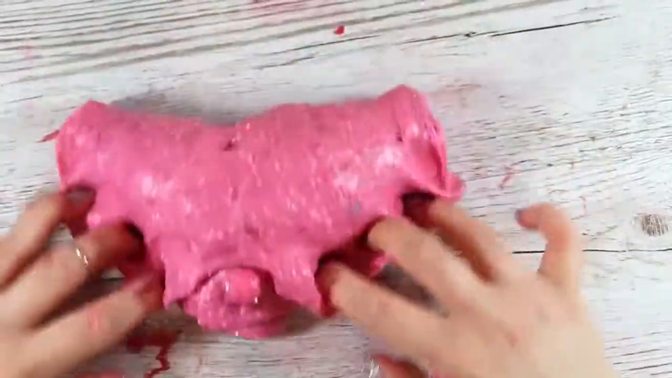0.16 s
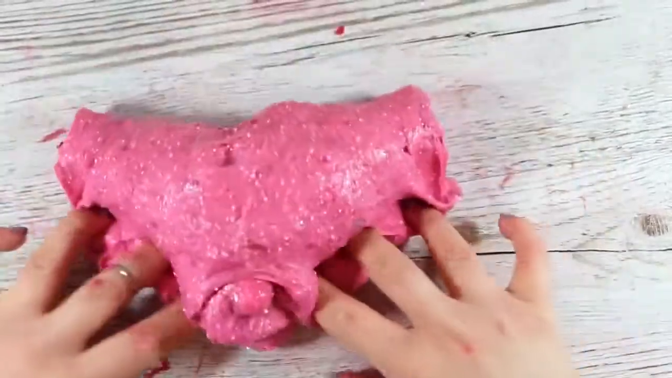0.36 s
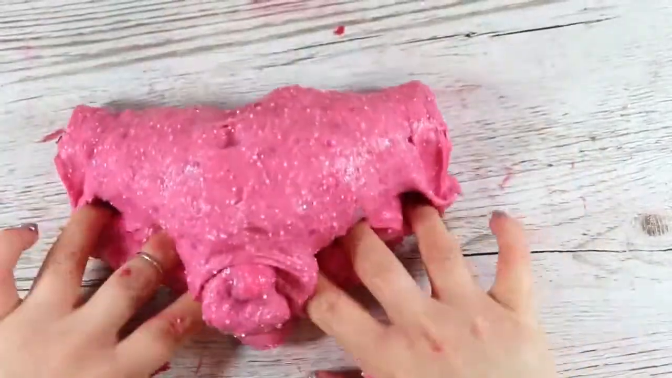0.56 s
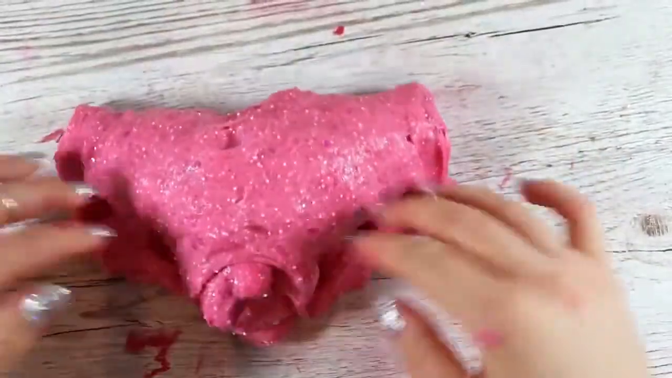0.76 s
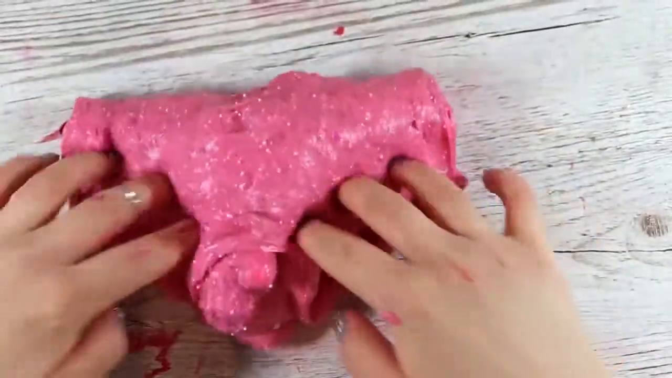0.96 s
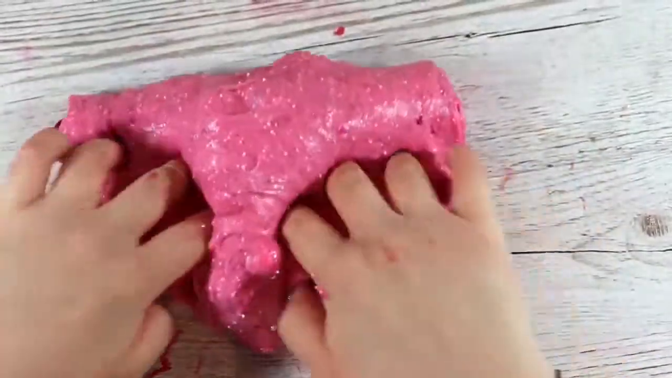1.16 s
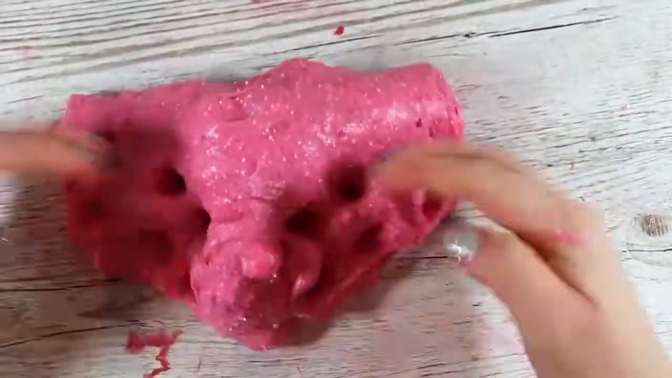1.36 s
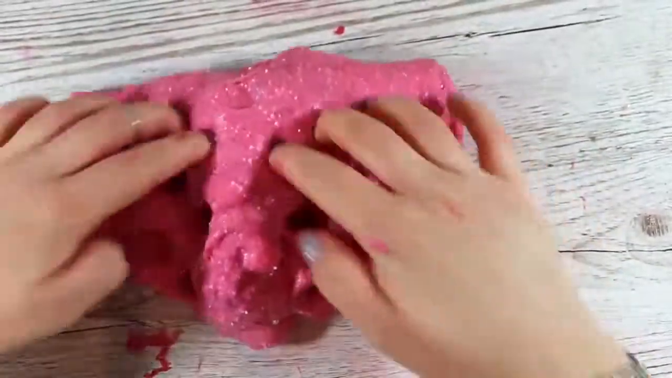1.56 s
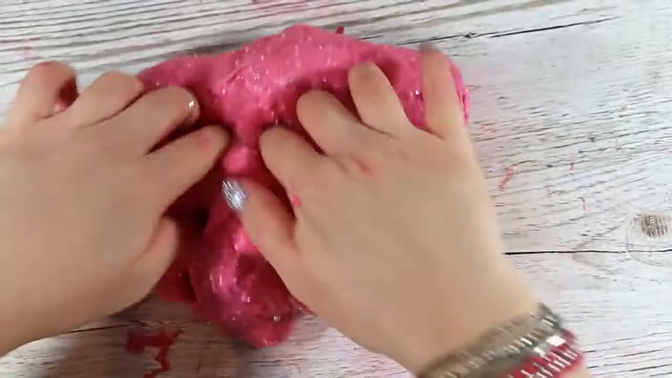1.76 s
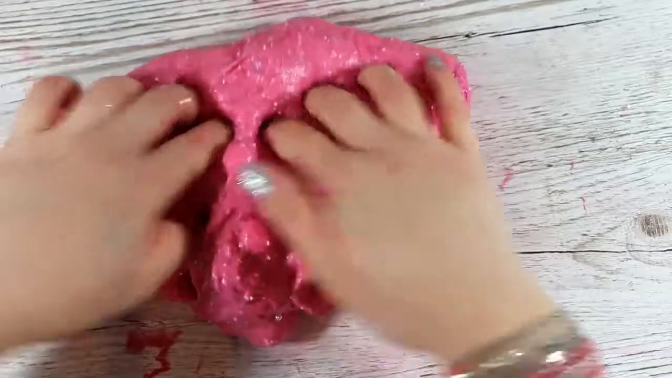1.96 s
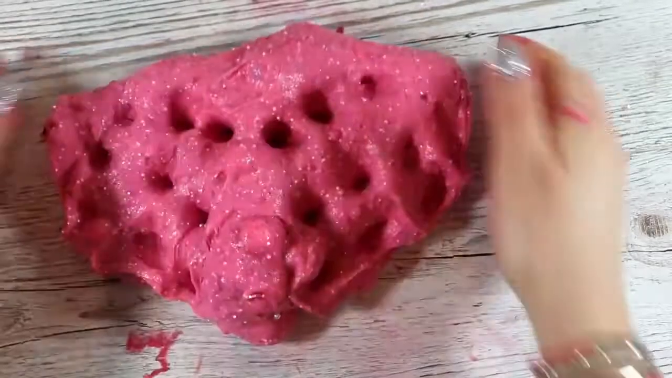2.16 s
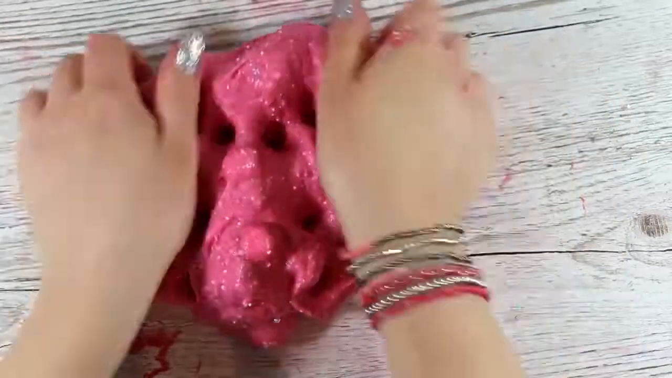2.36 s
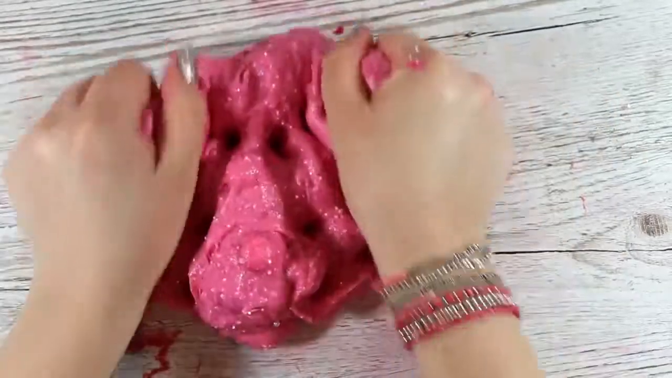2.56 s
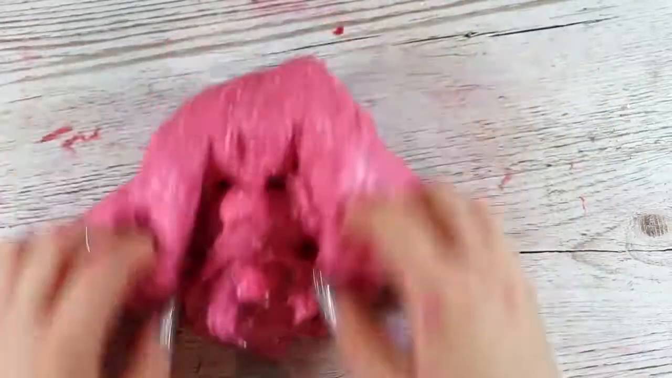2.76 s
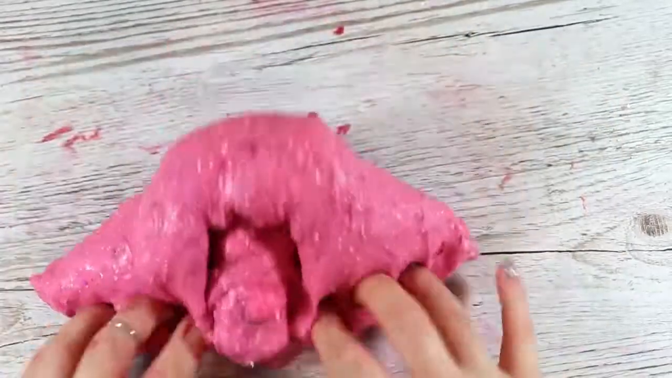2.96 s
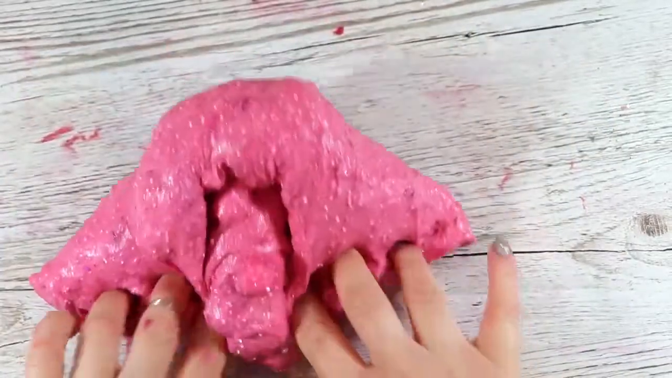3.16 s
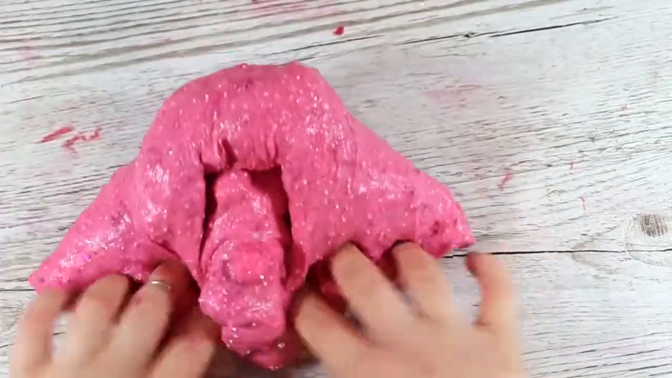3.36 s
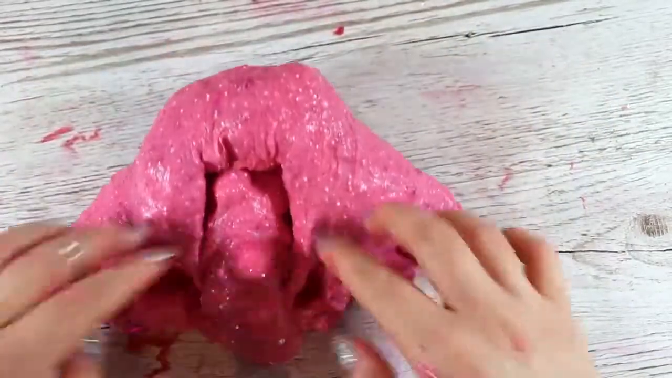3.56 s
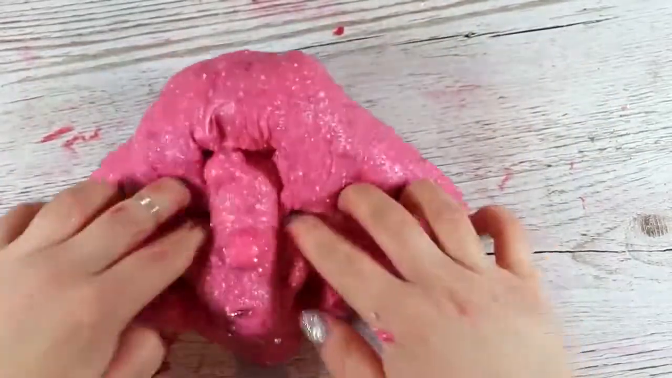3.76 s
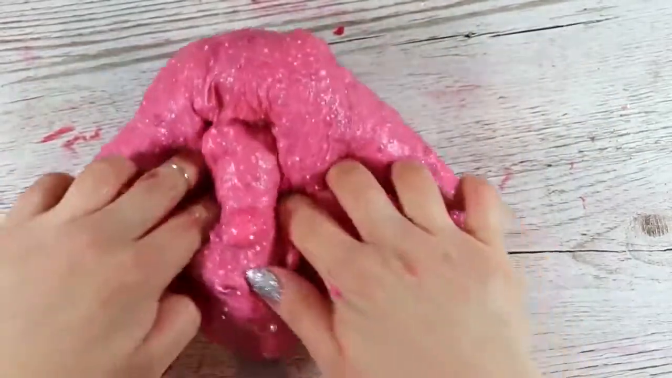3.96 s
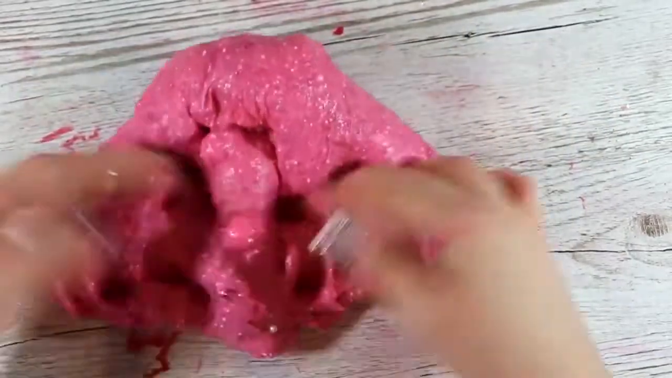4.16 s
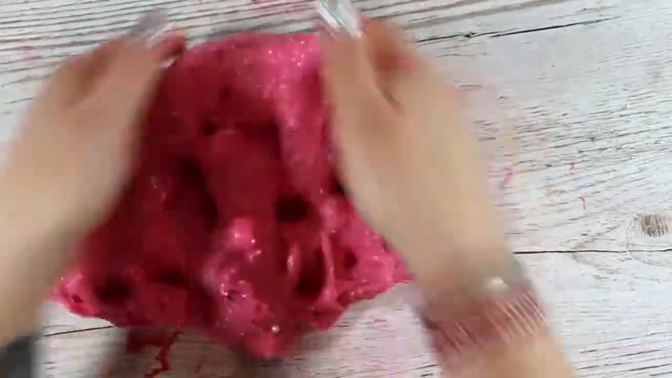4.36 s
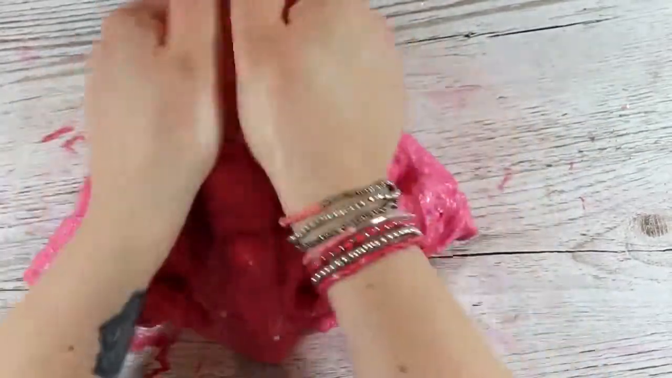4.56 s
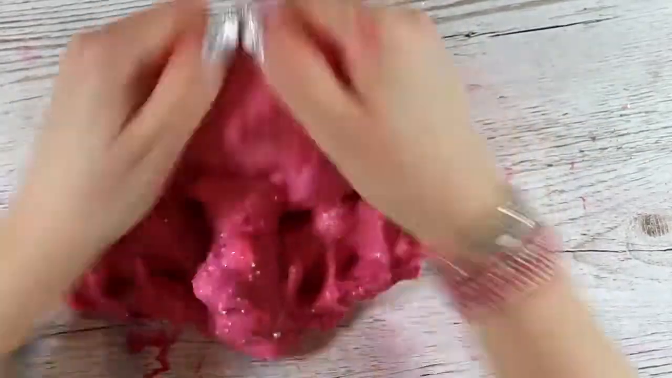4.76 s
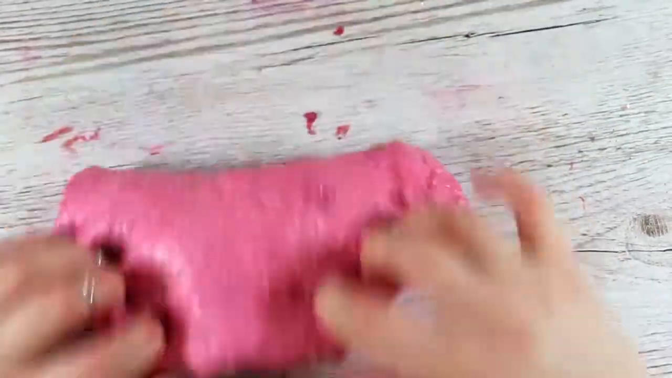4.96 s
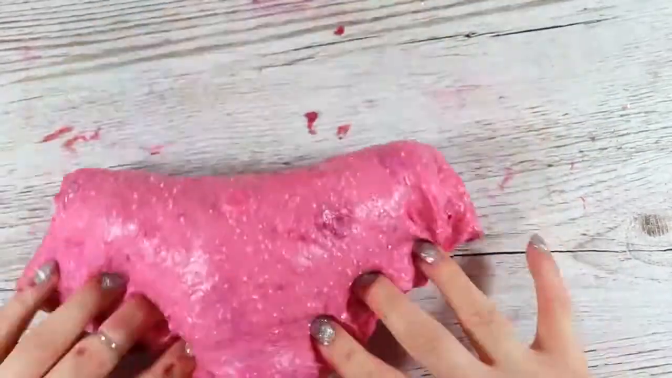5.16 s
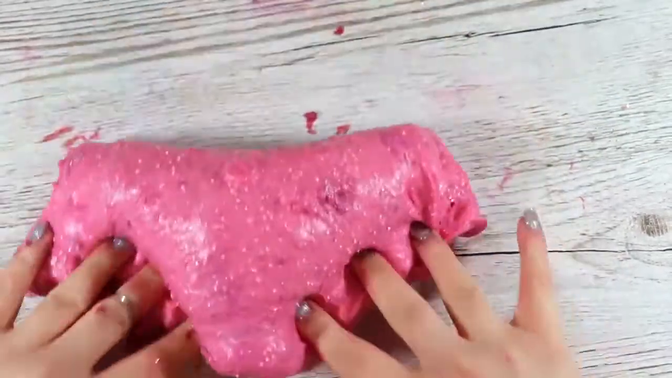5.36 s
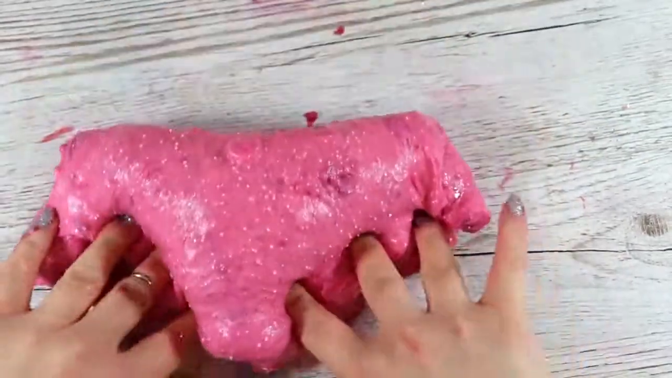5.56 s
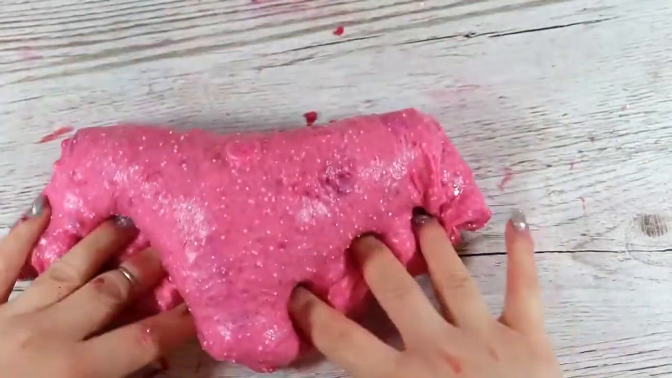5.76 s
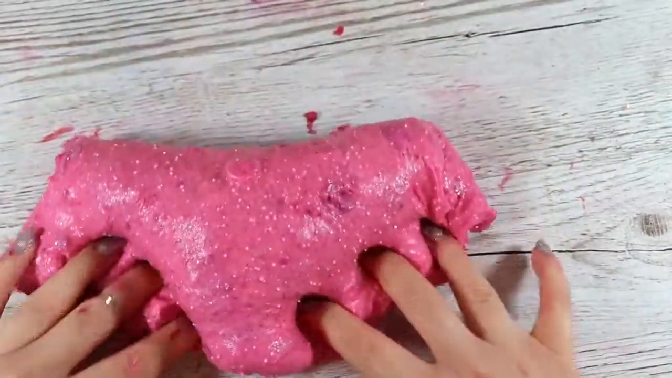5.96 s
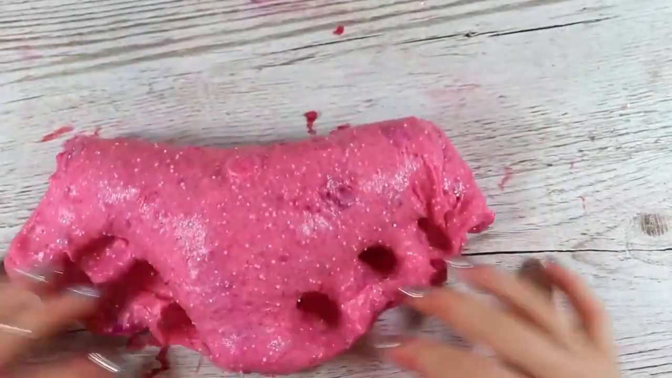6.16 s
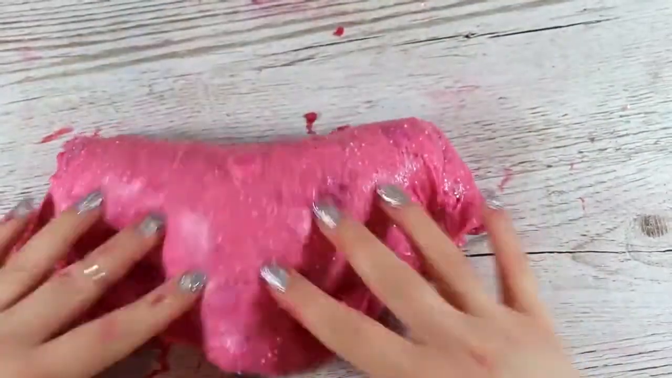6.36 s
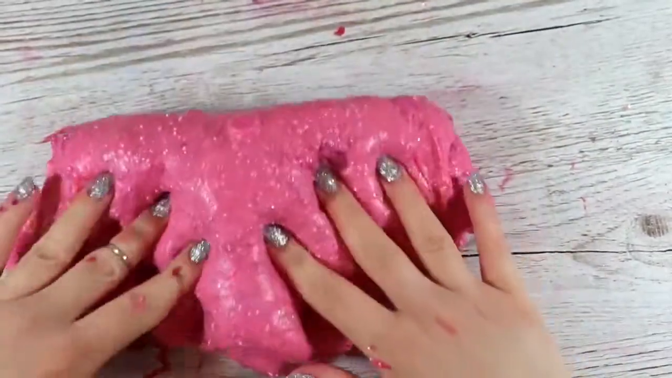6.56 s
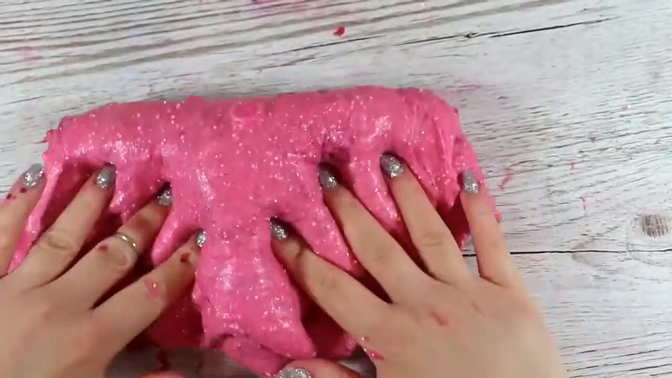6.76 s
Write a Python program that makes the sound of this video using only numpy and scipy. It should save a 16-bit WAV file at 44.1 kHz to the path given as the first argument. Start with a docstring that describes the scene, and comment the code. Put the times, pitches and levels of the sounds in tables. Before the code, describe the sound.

Close stereo sound of hands kneading sticky slime on a wooden table in a small, quiet room. A soft thud and squelchy press come first, then short crackling finger pulls with pauses. A loud, fizzy peel rips in the middle, more presses and sharp pops follow, then another tearing cluster with a hollow gulp, and finally quiet squishes and a last soft pull.

```python
"""In a small room, two hands knead a lump of sticky slime on a wooden table, heard close up in stereo.
Each press, pull of the fingers or peeling sheet builds, holds and dies away. It swells the swarms of
ringing air pockets: large ones squelch, small ones crackle and thin films fizz. Pops and small ticks are
short rings with ripping noise; soft thuds and hollow gulps are fading resonances with a splat of noise.
The walls add a short noise tail, and behind it all lie a faint hush and a low, wavering hum."""
import sys
import numpy as np
from scipy import signal
from scipy.fft import rfft, irfft, next_fast_len
from scipy.io import wavfile
from scipy.ndimage import map_coordinates

SR = 44100
rng = np.random.default_rng(int(sys.argv[2]) if len(sys.argv) > 2 else 0)


def generate_wav(sig):
    """Save sig (samples, or channels by samples) to the path in sys.argv[1] as 16-bit PCM at SR."""
    pcm = np.round(np.clip(np.atleast_2d(sig).T, -1, 1) * 32767).astype(np.int16)
    wavfile.write(sys.argv[1], SR, pcm)


N = 300762  # length in samples

# Resonances of the table and room; the lowest is a boom of the room:
# f/Hz, level/dB, time to fall 60 dB t60/s
RESONANCES = [(108.9, -11.5, 0.41), (163, -10.5, 0.21), (221.7, -13.5, 0.19), (288, -5, 0.094),
              (396.3, -4.5, 0.14), (455, -3, .09), (528, -2, 0.045), (740, -12, 0.027), (825, -6, 0.039),
              (1030, -7.5, .025)]


def slime(slip_rate_hz=60, slip_db=1.5, resonance_db=2):
    """Large cavities squelch, small pockets crackle, and thin films fizz as they leave the skin."""
    # Tone colour of large, small and tiniest air pockets: f/Hz, relative level per Hz/dB
    squelch_colour = [(50, -39), (100, 7.5), (170, 0.5), (270, 3), (440, 1), (650, -13), (1000, -0.5),
                      (2000, -47.5)]
    crackle_colour = [(250, -20), (600, -10.5), (1200, 1.5), (2200, 2.5), (3800, 0), (5500, -5),
                      (8000, -20.5), (14000, -38)]
    fizz_colour = [(2000, 0.5), (4000, -2.5), (6000, -5), (8000, -4.5), (11000, -12.5), (13500, -12),
                   (16000, -21)]

    coarse_s = np.arange(0, N / SR, .001)
    sample_s = np.arange(N) / SR
    slips = slip_db * wobble(slip_rate_hz)  # the slime lets go in jerks
    squelch_db, crackle_db, fizz_db = [
        np.interp(sample_s, coarse_s, level) + slips for level in kneading(coarse_s)]

    squelch = bursts(squelch_db, squelch_colour, lo_hz=106.1, hi_hz=904, rate=700, cycles=15.7,
                     spiky_db=1.0, spread_ms=0.14)
    # the squelch also sets off the resonances of the table and room
    squelch = squelch + amp(resonance_db) * filtered(squelch, resonance_response)
    crackle = bursts(crackle_db, crackle_colour, lo_hz=633, hi_hz=7200, rate=4500, cycles=16.3,
                     spiky_db=1.5, spread_ms=0.39)
    fizz = bursts(fizz_db, fizz_colour, lo_hz=3660, hi_hz=15560, rate=6000, cycles=20,
                  spiky_db=0, spread_ms=0.342)
    # stray brittle snaps stand out of the fizz: fewer, but far more uneven in strength
    snaps = bursts(fizz_db - 6.5, fizz_colour, lo_hz=2500, hi_hz=11000, rate=90, cycles=12,
                   spiky_db=4.5, spread_ms=0.23)
    mix = amp(-4) * squelch + amp(-2.0) * crackle + amp(1.67) * (fizz + snaps)
    return mix * amp([[.5], [-.5]])  # slightly louder on the left


def kneading(t):
    """Levels in dB of squelch, crackle and fizz: the powers of all the hands' moves added together."""
    # Fingers pull out of the lump: time at full strength t/s, hold/s, relative level/dB, extra fizz/dB
    pulls = [(0.809, .034, -36.5, 0), (1.447, .03, -35.5, 0), (2.138, .055, -36, 0),
             (3.544, .078, -38.5, -2), (4.27, .055, -36, 2), (6.242, .055, -38.5, -9)]
    # A sheet of slime rips off the palms: time at full strength t/s, hold/s, relative level/dB
    peels = [(2.29, .115, -23.5), (4.457, .03, -30.5), (4.497, .018, -26.5)]
    # Hands press and fold the lump: time at full strength t/s, hold/s, relative level/dB,
    # extra squelch/dB, extra fizz/dB
    presses = [(0.0, .045, -43, 5, 1), (.18, .08, -47.5, 9, 5), (.52, .13, -60, 7, 2),
               (1.11, .16, -59.5, 8, -5), (1.73, .02, -64, 5, 12), (2.48, .17, -40.5, -8, -5),
               (2.778, .195, -39.5, 0, 1), (3.027, .012, -40, -2, -7), (3.2, .16, -53, 4, 0),
               (3.992, .04, -55, 1, 0), (4.62, .11, -40, -10, -4), (4.759, .045, -33, -6, 5),
               (4.89, .025, -38.5, -6, 3), (4.98, .15, -53, -3, 1), (5.975, .035, -51, -3, 2),
               (6.068, .12, -58, 1, 4), (6.72, .08, -59, 5, 2)]

    # shapes: rise, sag while held, release, all in dB/s
    pull_shape, peel_shape, press_shape = (720, 10, 260), (9000, 52, 185), (420, 12, 170)
    # mixes: squelch and fizz in dB against the move's crackle
    pull_mix, peel_mix, press_mix = (-2.5, -1.5), (-14.5, -15), (-5, -6)
    squelch_lag_s = 0.0131  # large cavities open only once the fingers are on their way out
    fizz_haste = 1.3  # thin films die away this many times faster than the pockets

    moves = []
    for s, hold_s, db, more_fizz in pulls:
        moves.append((s, hold_s, db, pull_mix[0], pull_mix[1] + more_fizz, pull_shape, squelch_lag_s))
    for s, hold_s, db in peels:
        moves.append((s, hold_s, db, *peel_mix, peel_shape, 0))
    for s, hold_s, db, more_squelch, more_fizz in presses:
        moves.append((s, hold_s, db, press_mix[0] + more_squelch, press_mix[1] + more_fizz, press_shape, 0))

    # the lump never quite stops creeping, so each layer starts from a resting power
    squelch, crackle, fizz = amp((-64, -64, -72)) ** 2
    for s, hold_s, db, squelch_db, fizz_db, shape, lag_s in moves:
        squelch = squelch + stroke(t - s - lag_s, hold_s, db + squelch_db, shape)
        crackle = crackle + stroke(t - s, hold_s, db, shape)
        fizz = fizz + stroke(t - s, hold_s, db + fizz_db, shape, fizz_haste)
    return 10 * np.log10([squelch, crackle, fizz])


def stroke(t, hold_s, db, shape, haste=1, settle_db=-19, settle_db_per_s=85):
    """Power of one move of the hands: it builds, holds with a slight sag, lets go and settles."""
    rise, sag, release = shape
    held_db = db + rise * np.minimum(t, 0) - sag * np.clip(t, 0, abs(hold_s))
    after = haste * np.maximum(t - abs(hold_s), 0)
    # pockets go on bursting as the slime relaxes after a move
    fall_db = np.maximum(-release * after, settle_db - settle_db_per_s * after)
    return amp(np.maximum(held_db + fall_db, -150)) ** 2


def bursts(level_db, colour, lo_hz, hi_hz, rate, cycles, spiky_db, spread_ms,
           kin=.25, clump_s=.018, thinning=.35):
    """A swarm of bursting pockets that grows denser as it grows louder; rate is bursts/s at the loudest."""
    density = rate * amp((level_db - level_db.max()) * thinning)
    total = np.cumsum(density) / SR
    # more starts fall where the running count of bursts climbs faster
    start = np.searchsorted(total, rng.uniform(0, total[-1], int(total[-1])))
    pitch, chance, place, related = rng.random((len(start), 4)).T[:, :, None]

    # pockets torn in one clump tend to be of one size, so brief resonances come and go
    clump = (start[:, None] / (clump_s * SR)).astype(int)
    clump_pitch = rng.random(N)[clump]
    hz = lo_hz * (hi_hz / lo_hz) ** np.where(related < kin, clump_pitch, pitch)

    # where spiky_db is high, a few pockets are far stronger than the rest;
    # higher-pitched ones are shorter, so they are scaled up to give an even spectrum before colouring
    size = amp(-spiky_db * np.log(0.047 + chance)) * hz / np.sqrt(density[start, None])
    size = size * rng.choice([-1, 1], size.shape)  # pressed pockets blow out, stretched ones suck in

    n = np.arange(int(SR * cycles / lo_hz / 2))
    where = (start[:, None] + n).ravel()
    pair = []
    # each spot of the lump lies at its own distance from the left and right sides
    for way in (place, 1 - place):
        ring = size * cavity(n / SR - way * spread_ms / 1000, hz, cycles)
        pair.append(np.bincount(where, ring.ravel(), N)[:N])
    coloured = filtered(np.array(pair), lambda f: amp(along(colour, f)))
    return amp(level_db) * unit(coloured)


def cavity(t, hz, cycles):
    """An opened air pocket rings from t = 0 and is 60 dB down after so many cycles."""
    turns = np.maximum(t, 0) * hz
    return np.sin(2 * np.pi * turns) * amp(-60 * turns / cycles)


def wobble(rate_hz):
    """A smooth random curve with so many knots a second."""
    knots = rng.standard_normal(int(N * rate_hz / SR) + 4)
    return map_coordinates(knots, [np.arange(N) * rate_hz / SR])


def pops(cycles=9, skin=0.35, skin_s=0.012, snap=0.16, snap_s=0.00019,
         bounce=0.3, bounce_s=0.002072, lead_s=.00004, low_cut_hz=600):
    """The skin rips and snaps, its cavity rings briefly, and a nearby surface throws the pop back."""
    # Pops and small ticks, some of them tight clusters of bursts: t/s, relative level/dB, pitch f/Hz
    pop_list = [(0.3169, -26.5, 5450), (0.3559, -27, 4540), (1.1935, -34, 3200), (1.727, -24.5, 10200),
                (1.9167, -31.5, 3340), (2.1801, -13, 3360), (2.2915, -21, 3630), (2.4987, -33, 2500),
                (2.5585, -24, 2500), (2.5642, -15, 2040), (2.6171, -16, 3370), (3.2427, -25.5, 4430),
                (3.3152, -36, 3420), (3.5564, -20.5, 4000), (3.6004, -6.5, 5500), (3.897, -33, 6030),
                (3.989, -30.5, 6400), (4.0036, -30.5, 6000), (4.2795, -4, 5200), (4.4551, -22.5, 2800),
                (4.495, -19.5, 2800), (4.6805, -14, 3180), (4.75, -3, 2580), (4.7848, -13, 3640),
                (5.3027, -34.5, 7800), (5.315, -34.5, 8500), (5.3832, -38, 3070), (5.9771, -27.5, 3960),
                (6.514, -38, 8100), (6.772, -35.5, 6450)]
    out = np.zeros((2, N))
    before = SR // 200  # the rip starts 5 ms ahead of the ring
    t = np.arange(-before, SR // 40) / SR - np.array([[0], [lead_s]])  # left leads right
    low_cut = signal.butter(2, low_cut_hz, "high", fs=SR, output="sos")  # too small to radiate bass
    for s, db, hz in pop_list:
        # the rip is coloured by the cavity behind it
        rip = unit(filtered(rng.standard_normal(t.shape),
                            lambda f: (f / (hz ** 2 - f ** 2 + 2.5j * f * hz)) ** 2))
        rip = rip * amp(-60 * np.abs(t) / skin_s)
        tick = rng.standard_normal(t.shape[1]) * amp(-60 * np.abs(t) / snap_s)
        ring = cavity(t, hz, cycles) + bounce * cavity(t - bounce_s, hz, cycles)
        pop = ring + (snap * tick + skin * rip) / 2
        add(out, s - before / SR, amp(db) * signal.sosfilt(low_cut, pop))
    return out


def thuds(attack_s=0.00132, splat=0.42, splat_s=0.088, splat_hz=1100):
    """Each thud or gulp is a set of fading resonances plus a dull splat of noise; a wide spread is fuller."""
    # Soft thuds, and hollow gulps of the slime where the spread is narrow:
    # t/s, relative level/dB, centre of the energy f/Hz, spread/octaves
    thud_list = [(0.138, -13.5, 500, 1.8), (0.21, -18.5, 456, 1.9), (1.254, -38, 423, 1.9),
                 (1.759, -40.5, 130, 0.84), (2.487, -39.5, 141, 0.91), (2.629, -27, 256, 1.4),
                 (2.746, -30.5, 370, 0.86), (3.03, -43, 450, 2.4), (3.184, -42, 506, 1.2),
                 (4.283, -27, 273, 0.24), (4.674, -21.5, 450, 0.49), (4.752, -27, 400, 0.28),
                 (4.885, -39, 397, 0.3), (5.093, -41.5, 150, 0.79), (6.235, -37, 170, 1.4),
                 (6.35, -24, 620, 2.2), (6.502, -39.5, 130, 1.1)]
    out = np.zeros((2, N))
    t = np.arange(SR // 2) / SR
    hz, mode_db, t60 = np.transpose(RESONANCES)[:, :, None]
    for s, db, centre_hz, octaves in thud_list:
        reach = lambda f: np.exp(-(np.log2((f + 1) / centre_hz) / octaves) ** 2 / 2)
        strength = reach(hz) * amp(mode_db + rng.normal(0, 3.4, (2, *hz.shape)))
        tuning = 1 + rng.normal(0, .012, hz.shape)  # the pitches differ slightly each time
        # partly shared by both sides, partly their own
        phase = rng.normal(0, 0.78, hz.shape) + rng.normal(0, 0.52, (2, *hz.shape))
        modes = strength * np.sin(2 * np.pi * hz * tuning * t + phase) * amp(-60 * t / t60)
        ring = np.sum(modes, axis=1)
        air = filtered(rng.standard_normal(ring.shape), lambda f: reach(f) / (1 + (f / splat_hz) ** 6))
        air = unit(stereo_pair(*air)) * amp(-60 * t / splat_s)
        thud = (ring / np.abs(ring).max() + splat * air / 2) * (1 - np.exp(-t / attack_s))
        add(out, s, amp(db) * thud / np.abs(thud).max())
    return out * amp([[-1.5], [1.5]])  # louder on the right


def resonance_response(f):
    """How strongly the table and room answer at each frequency: a sum of damped resonances."""
    hz, mode_db, t60 = np.transpose(RESONANCES)[:, :, None]
    width_hz = np.log(1000) / np.pi / t60
    resonances = 1j * f * width_hz / (hz ** 2 - f ** 2 + 1j * f * width_hz)
    return np.sum(amp(mode_db) * resonances, axis=0)


def room(x, rise_s=0.001):
    """The walls answer with a short diffuse tail: noise that dies at its own speed in each band."""
    # How long the room rings: f/Hz, time to fall 60 dB t60/s
    decay_times = [(100, 1), (260, 0.18), (700, 0.34), (1840, 0.27), (4850, 0.29), (12800, 0.19)]
    hz, t, bands = signal.stft(rng.standard_normal((2, SR // 2)), SR, nperseg=256)
    fade = amp(-60 * t / along(decay_times, hz)[:, None])
    tail = signal.istft(bands * fade, SR, nperseg=256)[1]
    tail = tail * (1 - np.exp(-np.arange(tail.shape[1]) / SR / rise_s))
    tail = stereo_pair(*tail)
    return signal.fftconvolve(x, tail / np.linalg.norm(tail[0]), axes=1)[:, :N]


def room_tone(hush_db=-58, hum_db=-66.5, hum_hz=50):
    """A faint hush of shaped noise over a low hum, which wavers because it is a narrow band of noise."""
    # Tone colour of the hush: f/Hz, relative level per Hz/dB
    hush_colour = [(20, -10), (40, -10), (60, 3), (90, -6), (330, -8), (600, -11.5), (1200, -12),
                   (3000, -19), (8000, -23), (16000, -34)]
    hush = filtered(rng.standard_normal((2, N)), lambda f: amp(along(hush_colour, f)))
    hush = unit(stereo_pair(*hush))
    hum = unit(filtered(rng.standard_normal(N), lambda f: 1 / (1 + ((f - hum_hz) / 2) ** 2)))
    return amp(hush_db) * hush + amp(hum_db) * hum


def stereo_pair(mid, side, mono_hz=330):
    """Diffuse sound reaches two close microphones alike in the bass and unrelated in the treble."""
    side = filtered(side, lambda f: f / np.hypot(f, mono_hz))
    return np.array([mid + side, mid - side])


def amp(db):
    """Decibels to gain."""
    return 10 ** (np.asarray(db) / 20)


def unit(x):
    """Scale to an rms (average strength) of 1."""
    return x / np.sqrt(np.mean(x ** 2) + 1e-20)


def along(points, hz):
    """Read a curve of (f/Hz, value) points on a log frequency axis."""
    f, v = np.transpose(points)
    return np.interp(np.log(hz + 1), np.log(f + 1), v)


def filtered(x, response):
    """Multiply the spectrum of x by a response that depends on frequency."""
    m = next_fast_len(x.shape[-1] + SR // 4)  # spare room, so the end hardly wraps onto the start
    spectrum = rfft(x, m) * response(np.fft.rfftfreq(m, 1 / SR))
    return irfft(spectrum, m)[..., :x.shape[-1]]


def add(track, s, sound):
    """Mix a stereo sound into the track at time s."""
    part = track[:, max(round(s * SR), 0):][:, :sound.shape[-1]]
    part += sound[:, :part.shape[-1]]


def scene():
    """Slime, pops and thuds, each with its share of the room, over the room tone."""
    tearing = slime()
    popping = amp(5.0) * pops()
    thudding = amp(0.5) * thuds()
    wet = room(amp(-5.0) * tearing + amp(-8) * popping + amp(-4.0) * thudding)
    return tearing + popping + thudding + wet + room_tone()


def record(dry, top_hz=16100):
    """The highest treble is cut: the level slopes to nothing over 1 kHz around top_hz."""
    return filtered(dry, lambda hz: np.clip((top_hz - hz) / 1000 + .5, 0, 1))


dry = scene()
out = record(dry)
generate_wav(out)
```